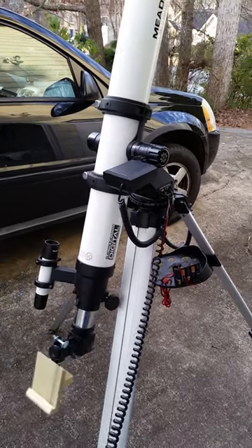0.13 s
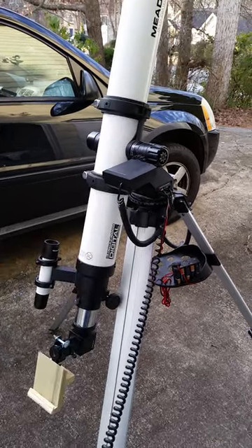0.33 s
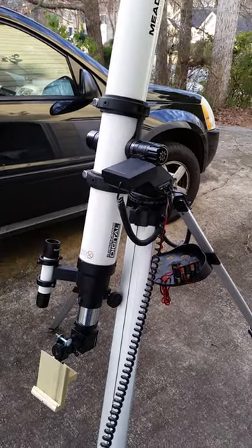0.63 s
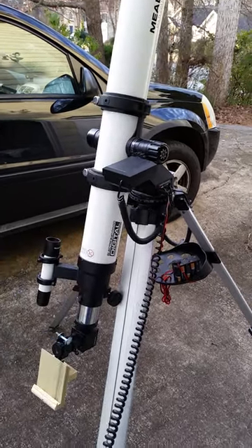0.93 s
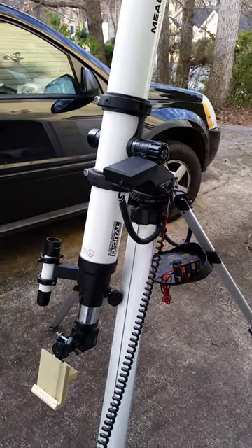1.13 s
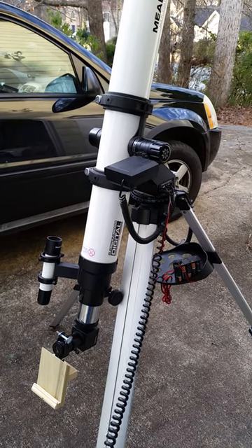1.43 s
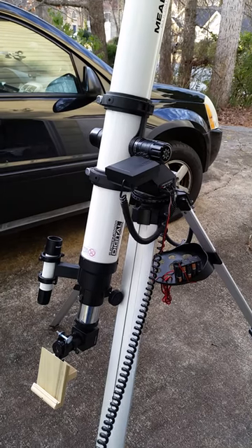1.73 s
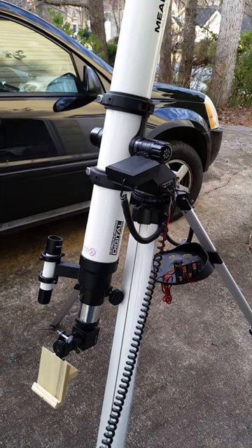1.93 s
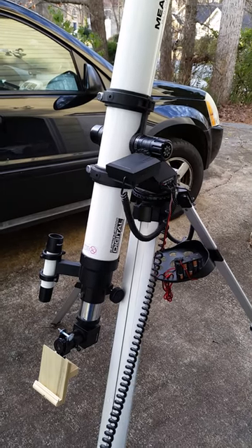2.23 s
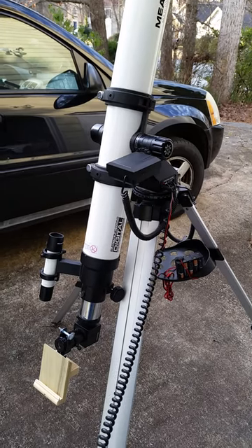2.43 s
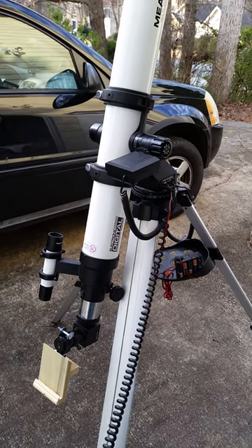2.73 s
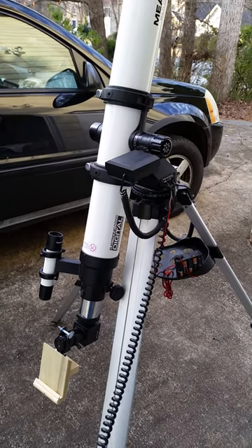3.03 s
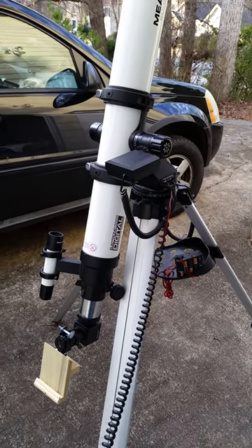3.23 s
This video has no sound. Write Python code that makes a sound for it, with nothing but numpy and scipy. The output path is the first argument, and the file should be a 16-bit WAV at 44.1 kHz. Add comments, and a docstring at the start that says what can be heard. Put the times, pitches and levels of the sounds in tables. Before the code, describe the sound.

A small geared telescope motor whines and grinds after the tube knocks and bounces to rest.

```python
"""A quiet driveway with a motorised telescope. A hand slides off the tube, which knocks against its
mount, rings and bounces to rest. A far bird calls twice, hoarse and falling. Then the small geared
drive motor spins up: its teeth whine and grind, and it slows under the load.
Underneath, distant traffic rumbles and a narrow hiss sits in the left microphone."""
import sys
import numpy as np
from scipy import signal
from scipy.fft import rfft, irfft, next_fast_len
from scipy.io import wavfile
from scipy.ndimage import map_coordinates

SR = 44100
rng = np.random.default_rng(int(sys.argv[2]) if len(sys.argv) > 2 else 0)


def materialize(psi):
    """Save the field psi as 16-bit PCM at rate SR to the path in sys.argv[1].

    A 1-D psi becomes a single channel; in a 2-D psi each row is a channel.
    """
    bounded = np.clip(np.atleast_2d(psi).T, -1, 1)
    quanta = np.round(bounded * 32767).astype(np.int16)
    wavfile.write(sys.argv[1], SR, quanta)


N = 148617


def amp(db):
    """Decibels to gain."""
    return 10 ** (np.asarray(db) / 20)


def unit(x):
    """Scale to rms 1."""
    return x / np.sqrt(np.mean(x ** 2) + 1e-20)


def along(points, hz):
    """Read a curve of (Hz, value) points on a log frequency axis."""
    freqs, values = np.transpose(points)
    return np.interp(np.log(hz + 1), np.log(freqs + 1), values)


def clock():
    """Seconds at each sample."""
    return np.arange(N) / SR


def curves(rows):
    """Automation lanes: one for each column after the time."""
    times, *columns = np.transpose(rows)
    return [np.interp(clock(), times, column) for column in columns]


def wobble(rate):
    """A smooth random curve, rate knots a second."""
    return map_coordinates(rng.standard_normal(N // 8), [clock() * rate], mode="wrap")


def filtered(x, response):
    """Filter x by a gain given as a function of Hz."""
    size = next_fast_len(N + SR // 4)
    return irfft(rfft(x, size) * response(np.fft.rfftfreq(size, 1 / SR)), size)[..., :N]


def noise(eq, extra_db=lambda hz: 0):
    """Noise of rms 1, coloured by (Hz, dB) points plus an optional function of Hz."""
    return unit(filtered(rng.standard_normal(N), lambda hz: amp(along(eq, hz) + extra_db(hz))))


def wide_noise(*colour):
    """Stereo noise: one colour, independent left and right."""
    return np.array([noise(*colour), noise(*colour)])


def fade(start, t60, attack):
    """Envelope of a blow: a quick rise, then 60 dB of decay in t60 seconds."""
    age = np.maximum(clock() - start, 0)
    return 1e3 ** (-age / t60) * (1 - np.exp(-age / attack))


def tone(phase, rough, rate):
    """A sine blended with narrow noise; rough is the noise's share, rate sets its width."""
    in_phase = np.sqrt(2 * (1 - rough)) + np.sqrt(rough) * wobble(rate)
    return in_phase * np.sin(phase) + np.sqrt(rough) * wobble(rate) * np.cos(phase)


def echoes(x, t60):
    """Diffuse reflections, different in each ear."""
    tail = rng.standard_normal((2, SR)) * fade(0, t60, 0.019)[:SR]
    return signal.fftconvolve(np.atleast_2d(x), tail / np.linalg.norm(tail[0]), axes=1)[:, :N]


def hiss():
    """Microphone noise: a narrow band, mostly left, and faint air in both sides."""
    # Colours of the band and the air. Each row: frequency in Hz, relative level in dB.
    band_eq = [(2000, -43), (3300, -31), (3800, -11.5), (4150, 0), (4500, 3), (4850, -2), (5400, 1),
               (5750, -14), (6100, -37), (7000, -39)]
    air_eq = [(1500, 2.5), (4000, 2), (6500, -18.5), (10000, -6), (12000, -0.5), (15500, 6.5)]
    return amp([[-63.5], [-85]]) * wide_noise(band_eq) + amp(-80) * wide_noise(air_eq)


def traffic():
    """Far road rumble, with an engine whose notes swell and fade."""
    # Colour of the road. Each row: frequency in Hz, relative level in dB.
    road_eq = [(12, -59), (20, -5), (43, -9), (75, 1.5), (128, -2.5), (156, -7.5), (205, -6.5),
               (238, -12.5), (322, -18), (976, -37.5), (1320, -37.5), (1740, -44), (3300, -55.5),
               (4290, -90), (7260, -120)]
    # Stereo image of the road. Each row: frequency in Hz, left-right likeness from -1 to 1.
    likeness = [(60, 0.15), (150, 0.81), (380, 0.48), (950, -0.21), (2380, -0.13), (5980, 0.75),
                (15000, 0.24)]
    # Engine notes. Each row: pitch in Hz, peak level before panning in dB, peak time and spread in seconds.
    drone = [(108.3, -60, 1.1, 1), (157.2, -56.5, 1.9, 0.48), (198, -64.5, 1.8, 0.71),
             (82.76, -52.5, 2.79, 0.28), (157, -57.5, 3.17, 0.75)]
    # Panning of road and engine. Each row: frequency in Hz, left minus right in dB.
    balance = [(60, -11.0), (110, -1.5), (200, -1.0), (380, -0.5), (700, 1.5), (1290, 2.5), (2380, 2.5),
               (4400, 21.0), (8120, -1.0), (15000, -1.0)][:6]

    def mid_side_gains(hz):
        width = np.arccos(np.clip(along(likeness, hz), -1, 1)) / 2
        return amp(along(road_eq, hz)) * [np.cos(width), np.sin(width)]

    mid, side = filtered(rng.standard_normal((2, N)), mid_side_gains)
    road = amp(-52 + wobble(5.06)) * unit(np.array([mid + side, mid - side]))
    engine = np.zeros(N)
    for hz, db, peak_s, spread_s in drone:
        swell = amp(db) / (1 + ((clock() - peak_s) / spread_s) ** 2)
        engine += swell * tone(2 * np.pi * hz * clock(), rough=0.33, rate=13)
    return filtered(road + engine, lambda hz: amp(along(balance, hz) * np.array([[.5], [-.5]])))


def bird():
    """Two far, hoarse, falling calls, blurred by the trees."""
    # Each row is a call: start and length in seconds, first and last pitch in Hz,
    # relative levels of note and rasp in dB.
    calls = [(1.123, 0.17, 1416, 1228, -72.5, -97.5), (1.722, .2, 1430, 1287, -69.5, -71.5)]
    # Breathy part of the call. Each row: frequency in Hz, relative level in dB.
    rasp_eq = [(900, -17), (1400, 8), (2200, -11), (2800, -8), (3400, -1), (4300, -1), (5500, -25),
               (7000, -47)]
    voice = np.zeros(N)
    for start, length, first_hz, last_hz, db, rasp_db in calls:
        progress = np.clip((clock() - start) / length, 0, 1)
        phase = 2 * np.pi * np.cumsum(first_hz + (last_hz - first_hz) * progress) / SR
        arch = np.abs(np.sin(np.pi * progress)) ** .5
        voice += arch * (amp(db) * tone(phase, rough=1.0, rate=120) + amp(rasp_db) * noise(rasp_eq))
    return (0.44 * voice + 0.69 * echoes(voice, t60=1.37)) * amp([[1.5], [-1.5]])


def handling():
    """The hand slides off the tube and jolts the plastic fittings."""
    # Fader moves of the sliding hand and its low rumble. Each row: time in seconds, relative level in dB.
    rub = [(0, -40.5), (.05, -46.5), (.1, -49), (.2, -53), (.3, -58.5), (.45, -56.5), (.6, -110)]
    bump = [(0, -51.5), (.35, -50), (.55, -62), (.8, -91.5)]
    # Colour of the fittings. Each row: frequency in Hz, relative level in dB.
    fittings_eq = [(100, -18), (230, 10), (380, -12), (560, -0.5), (680, 1), (830, -6), (1200, -9.5),
                   (1700, -10.5), (3000, -18.5), (4500, -10.5), (7000, -32), (9000, -52), (10500, -23),
                   (16000, -36)]
    # Each row is a clunk: start in seconds, relative level in dB, centre in Hz, click against body in dB.
    clunks = [(0.0, -31, 550, -27), (.1105, -33, 1400, -19), (0.1321, -31.5, 650, -10),
              (0.246, -47, 1400, -25), (.259, -45, 500, -32), (2.606, -70.5, 900, -30)]
    rumble_eq = [(20, -7), (70, -4.5), (140, -8), (400, -42), (1500, -87)]
    click_eq = [(1000, 1.5), (3000, -19), (4300, -3), (7000, -30.5), (11000, 12), (16000, -29)]
    out = amp(curves(rub)[0] + 2) * wide_noise(fittings_eq, lambda hz: -2 * np.log2(1 + hz / 800))
    out += amp(curves(bump)[0] - 4) * noise(rumble_eq)
    for start, db, centre_hz, click_db in clunks:
        focus = lambda hz: -6 * np.abs(np.log2((hz + 1) / centre_hz))
        body = fade(start, 0.061, 0.00058) * noise(fittings_eq, focus)
        scatter = amp(-10) * fade(start, 0.18, 0.0063) * wide_noise(fittings_eq, focus)
        click = amp(click_db) * fade(start, 0.007, 0.00035) * noise(click_eq)
        out += amp(db + 4) * (body + scatter + click)
    return out


def knocks():
    """Each bounce on the mount rings the tube, the softer ones duller. Loose parts buzz briefly."""
    # Each row is a bounce: start in seconds, relative level in dB, treble tilt in dB per octave,
    # ring length from 0 to 1, ring trim in dB.
    bounces = [(0.3152, -22.5, 0, 0.88, 0.5), (.608, -34, -4, 0.82, -3), (.764, -40, -8.5, 0.69, -3),
               (.877, -48.5, -9, 0.83, -1.5), (.962, -52.5, -17, 0.58, -4)]
    # Tube modes. Each row: pitch in Hz, relative level in dB, t60 at full ring length in seconds.
    modes = [(239, -10.5, 0.12), (401.5, -32, 0.6), (544.6, -8.5, 0.15), (706.2, 0, 0.17),
             (719, -3.5, 0.38), (787, -15.5, 0.17), (890, -8, 0.14), (1036, -7, .07), (1496, -20, 0.088),
             (1760, -28, 0.24), (1900, -36, 0.18), (2124, -23, 0.21), (5390, -39, 0.18)]
    # Crack of the impact. Each row: frequency in Hz, relative level in dB.
    crack_eq = [(100, -13), (250, 3.5), (380, -4), (550, 2.5), (950, 7), (1200, -11.5), (2000, -4),
                (3300, -18.5), (5200, -8.5), (6500, -29), (8500, -46), (10300, -13), (13000, -29),
                (16000, -29)]
    tick_eq = [(2000, 3.5), (16000, -15.5)]
    out = np.zeros((2, N))
    for start, db, tilt_db, length, ring_db in bounces:
        dull = lambda hz: tilt_db * np.log2(np.maximum(hz / 800, 1))
        ring = np.zeros(N)
        for hz, mode_db, t60 in modes:
            phase = 2 * np.pi * hz * (clock() - start) + 0.6 * wobble(70)
            ring += amp(mode_db + dull(hz)) * fade(start, t60 * length, 0.0028) * np.sin(phase)
        buzz = amp(-4) * fade(start, 0.085, 0.00038) * noise(crack_eq, dull)
        scatter = amp(-16.5) * fade(start, 0.54 * length, 0.0061) * wide_noise(crack_eq, dull)
        tick = amp(-6 + 6 * tilt_db) * fade(start, .006, 0.00061) * noise(tick_eq)
        out += amp(db) * (amp(ring_db) * ring + buzz + scatter + tick)
    return out


def motor():
    """A pinion whines against an uneven wheel; the teeth grind harder as the load slows it."""
    # Fader moves of the gears. Each row: time in seconds, whine level in dB, grind level in dB.
    effort = [(2.67, -100, -100), (2.735, -65.5, -75), (2.79, -55.5, -57.5), (2.85, -64.5, -56.5),
              (2.93, -52.5, -56.5), (3.08, -50.5, -52.5), (3.16, -49, -52.5), (3.23, -59, -52),
              (3.37, -60, -52)]
    # Overtones of the tooth mesh. Each row: multiple, level at top speed in dB, gain under load in dB,
    # roughness from 0 to 1, load from 0 to 1 at which half that gain is reached.
    mesh_overtones = [(2, -64.5, 7, 0.15, 0.63), (3, -67.5, 13, .25, 0.1), (4, -58.5, -8, 0.2, 0.54),
                      (5, -53, -12.5, 0.5, 0.26), (6, -69.5, 11, 0.97, 0.57), (7, -80, 6, .95, .5)]
    # Shaft hum. Each row: multiple of the shaft rate, level at top speed in dB, gain under load in dB.
    shaft_orders = [(4, -62, -6), (5, -72.5, 5.5), (6, -65.5, -7), (7, -77.5, 9.5), (8, -73, 11),
                    (9, -69, -0.5), (10, -63, 3), (11, -84, 10), (13, -70, 17.5), (15, -74, -8),
                    (18, -72.5, -5)]
    # Colours of the grinding teeth and of the mount's jolt as the motor starts.
    # Each row: frequency in Hz, relative level in dB.
    grind_eq = [(150, -14), (300, 4), (600, 0), (1000, -2.5), (1600, 5.5), (2100, 9), (2500, -4.5),
                (3200, -9.5), (4300, 2.5), (5800, -1.5), (6800, -48), (9300, -30.5), (10500, -4.5),
                (11600, -20.5), (13000, -16), (15500, -23)]
    jolt_eq = [(150, -7.5), (295, 3.5), (360, -9), (430, 1), (600, -18), (1600, -20), (3000, -51.5)]
    teeth, wheel_ratio, top_shaft_hz = 12, .4, 173.3
    start_s, spin_up_s = 2.685, .077
    sag_from_s, load_from_s, load_full_s = 2.91, 3.03, 3.407

    spin_up = 1 - np.exp(-(np.maximum(clock() - start_s, 0) / spin_up_s) ** 1.6)
    sag_s = np.maximum(clock() - sag_from_s, 0)
    shaft_hz = spin_up * (top_shaft_hz - 22 * sag_s - 56 * sag_s ** 2)
    load = np.clip((clock() - load_from_s) / (load_full_s - load_from_s), 0, 1)

    # Phases in radians: shaft and wheel each swing the mesh once a turn.
    shaft = 2 * np.pi * np.cumsum(shaft_hz * (1 + 0.0011 * wobble(50))) / SR
    wheel = wheel_ratio * shaft
    backlash = (0.052 + 3.8 * (1 - spin_up)) * wobble(400)
    mesh = teeth * shaft + 0.19 * np.sin(shaft) + .08 * np.sin(wheel) + backlash

    whine_db, grind_db = curves(effort)
    whine = amp(whine_db) * tone(mesh, rough=.02, rate=90) * (1 + 0.29 * np.sin(wheel))
    for k, db, gain_db, rough, half_load in mesh_overtones:
        load_db = gain_db / (1 + np.exp(10 * (half_load - load)))
        entry = spin_up ** (2 + 6.8 * (k - 2) ** 2)  # higher overtones need more speed to sound
        whine += amp(db + load_db) * entry * tone(k * mesh, rough, rate=40 * k)
    hum = sum(amp(db + gain_db * load) * tone(k * shaft, rough=0.19, rate=30)
              for k, db, gain_db in shaft_orders)
    scrape = unit(amp(1.4 * np.sin(shaft) + 2 * np.sin(wheel) + 2 * np.cos(mesh)))
    near, far = amp(grind_db) * scrape * wide_noise(grind_eq)
    grind = np.array([near, 0.39 * near + far])
    jolt = amp(-52) * fade(start_s + 0.016, t60=0.4, attack=0.012) * noise(jolt_eq)
    return whine + spin_up ** 20 * hum + jolt + grind


def from_left(pair, shade, lag_s=0.00014):
    """The right microphone hears the mount later and duller."""
    left, right = pair
    response = lambda hz: amp(along(shade, hz)) * np.exp(-2j * np.pi * hz * lag_s)
    return np.array([left, filtered(right, response)])


def scene():
    """The mount stands close by on the left; car and driveway return a little of it."""
    # Right-side EQ for the blows and for the motor. Each row: frequency in Hz, gain in dB.
    blow_shade = [(100, 0.5), (300, 0), (700, -0.5), (1300, -1.5), (2400, -9.5), (4400, -13.5), (8000, -20),
                  (11000, -10), (15000, -7)]
    motor_shade = [(200, 6.5), (700, -5.5), (1300, -5.5), (2400, -6), (4400, -21.5), (8000, -29.5),
                   (11000, -13.5), (15000, -7)]
    blows, drive = knocks() + handling(), motor()
    blows += amp(-19) * echoes(blows, t60=.25)
    drive += amp(-13) * echoes(drive, t60=.12)
    return from_left(blows, blow_shade) + from_left(drive, motor_shade) + bird() + traffic() + hiss()


def record(dry):
    """A brick-wall low-pass trims the very top."""
    top_hz = 15800
    return filtered(dry, lambda hz: hz < top_hz)


dry = scene()
out = record(dry)
materialize(out)
```